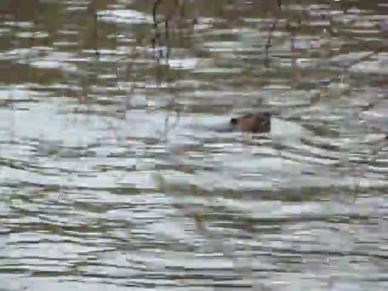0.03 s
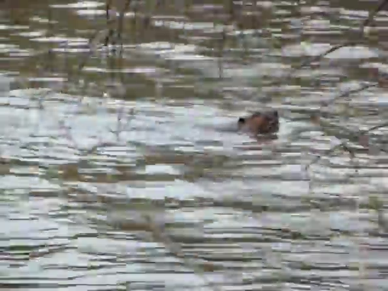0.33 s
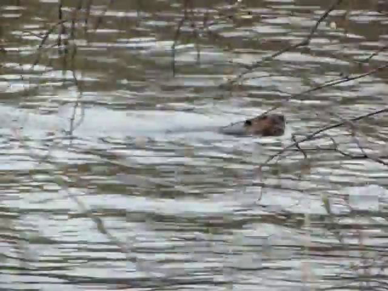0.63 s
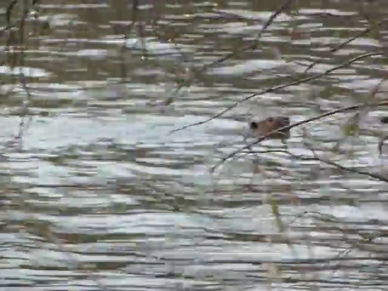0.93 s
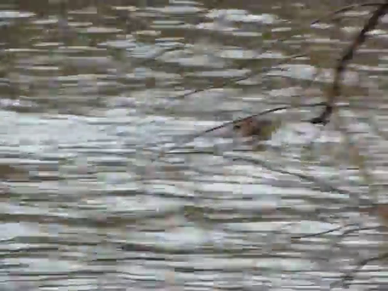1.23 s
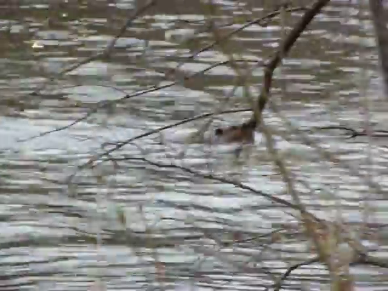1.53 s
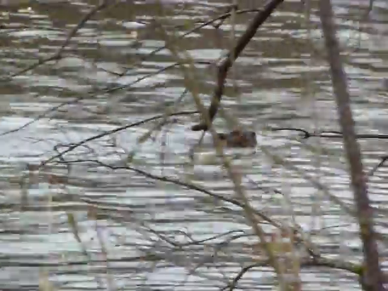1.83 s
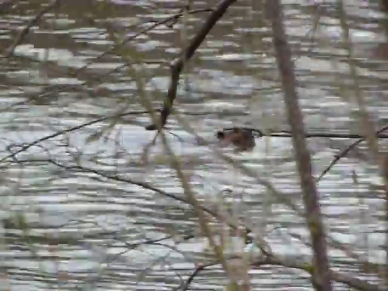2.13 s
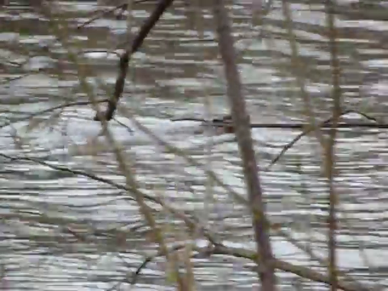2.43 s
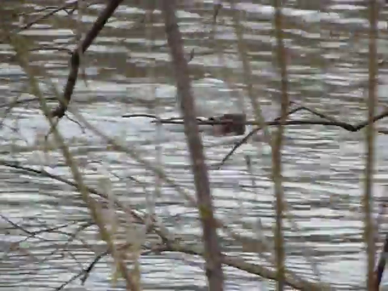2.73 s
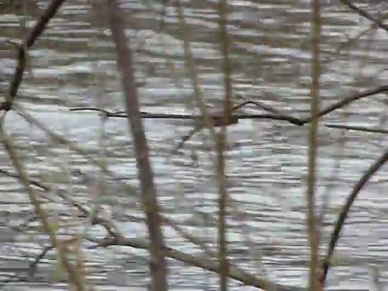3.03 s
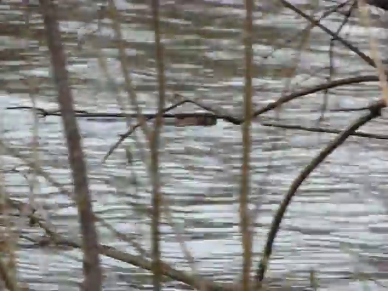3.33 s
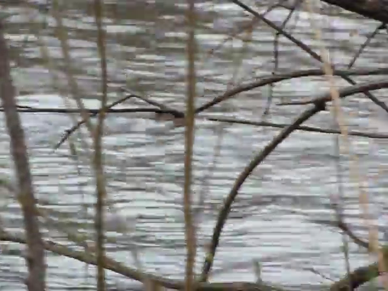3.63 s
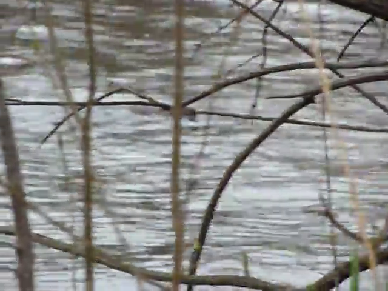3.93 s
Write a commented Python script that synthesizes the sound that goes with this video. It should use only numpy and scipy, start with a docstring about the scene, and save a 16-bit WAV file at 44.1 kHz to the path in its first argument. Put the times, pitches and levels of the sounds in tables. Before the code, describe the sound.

Flowing river water makes an even, low rush outdoors. A brief puff of wind hits the microphone and a distant bird chirps faintly, then stronger wind rumbles on the microphone and ends in loud, knock-like slaps.

```python
"""A wide river flows steadily past a wooded bank, heard from the bank on one microphone open to the wind.
The current is an even rush with tiny ringing bubbles. Off in the trees a small bird twitters and ticks
faintly, and dry grass rustles. Right on the microphone, a brief puff of wind opens the scene; from just
past halfway a rising gust buffets it: low flutter first, then hard slaps that sound like knocks.
The stronger the wind, the higher in frequency its turbulence reaches."""
import sys
import numpy as np
from scipy import signal
from scipy.fft import rfft, irfft, next_fast_len
from scipy.io import wavfile
from scipy.ndimage import uniform_filter1d, minimum_filter1d, map_coordinates

SR = 44100
rng = np.random.default_rng(int(sys.argv[2]) if len(sys.argv) > 2 else 0)


def int16_out(signal):
    """Quantize to a 16-bit WAV file."""
    q = np.round(np.clip(np.atleast_2d(signal).T, -1, 1) * 32767)
    wavfile.write(sys.argv[1], SR, q.astype(np.int16))


N = 176400

# the current as heard from the bank: f/Hz, relative level/dB
RIVER_SPECTRUM = [(25, -17.5), (40, -9), (75, 1.5), (130, -2.5), (230, -3), (380, -11), (750, -10),
                  (1200, -13.5), (2000, -21.5), (3000, -28), (4200, -32), (6500, -39), (8200, -43.5)]
# a small lap of water: t/s, level/dB, half-length/s, reach f/Hz
WATER_LAPS = [(1.016, -43.5, 0.0087, 850)]
# the opening puff at the microphone: t/s, level/dB
PUFF_LEVELS = [(0, -29.5), (.035, -27.5), (.06, -54), (.15, -65), (.22, -40), (.29, -73), (.355, -40),
               (.41, -47), (.5, -65)]
# the rising gust at the microphone: t/s, level/dB
GUST_LEVELS = [(2.44, -70), (2.474, -41), (2.504, -45), (2.538, -26), (2.578, -50), (2.612, -35.5),
               (2.678, -45.5), (2.708, -32.5), (2.73, -46.5), (2.756, -26), (2.778, -38.5), (2.808, -25.5),
               (2.87, -45), (2.904, -44), (2.938, -27.5), (2.96, -24), (3.0, -27.5), (3.026, -24),
               (3.1, -22), (3.148, -32.5), (3.174, -28.5), (3.248, -32.5), (3.368, -24.5), (3.382, -20),
               (3.456, -20.5), (3.474, -31), (3.5, -21.5), (3.534, -33.5), (3.578, -21), (3.608, -34.5),
               (3.638, -21), (3.686, -28), (3.72, -19.5), (3.774, -10.5), (3.794, -18), (3.882, -19.5),
               (3.9, -35), (3.93, -10.5), (3.952, -19.5), (4.0, -9.5)]
# turbulence, before the wind's strength sets its treble: f/Hz, relative level/dB
BUFFET_SPECTRUM = [(20, -12), (50, -4.5), (110, 2), (200, 1.5), (400, -7), (1000, -14), (3000, -28),
                   (8000, -33.5)]
# hard eddies hitting the microphone: t/s, level/dB, half-length/s, reach f/Hz
EDDY_SLAPS = [(2.474, -36, 0.0064, 140), (2.604, -35.5, 0.0087, 300), (2.808, -19.5, 0.0051, 118),
              (2.969, -30, 0.0039, 400), (3.094, -26.5, 0.016, 377), (3.206, -26.5, 0.0045, 510),
              (3.415, -37, 0.016, 380), (3.446, -15, 0.0022, 674), (3.578, -25.5, 0.003, 189),
              (3.638, -24.5, 0.0092, 200), (3.722, -7.5, 0.0026, 780), (3.732, -7, 0.0026, 1504),
              (3.745, -9.5, 0.0023, 550), (3.759, -5.5, 0.0059, 193), (3.775, -7, 0.003, 900),
              (3.787, -12, 0.0065, 1360), (3.800, -15, 0.0036, 850), (3.816, -19.5, 0.013, 900),
              (3.836, -18.5, 0.0014, 1300), (3.858, -28, 0.0033, 640), (3.875, -17, 0.0026, 600),
              (3.930, -15.5, 0.0051, 450), (3.938, -14.5, 0.0055, 900), (3.989, -17.5, 0.015, 684)]
# a slap, before it is rolled off by its reach: f/Hz, relative level/dB
SLAP_SPECTRUM = [(20, -15.5), (100, -0.5), (300, 2), (700, -2.5), (1500, -8), (3000, -12.5), (4500, -18.5),
                 (8000, -26)]
# the bird's dry ticks: t/s, level/dB, half-length/s, pitch f/Hz
BIRD_TICKS = [(1.836, -63, .004, 6000), (1.914, -65, .004, 6300), (2.045, -65, .012, 6200),
              (2.141, -51, 0.01, 6360), (2.390, -52, 0.0069, 6760), (2.630, -53, 0.0064, 6500),
              (3.538, -71, .003, 5940)]
# its thin twitter notes: t/s, level/dB
BIRD_NOTES = [(.10, -74), (.20, -71.5), (.325, -71.5), (.435, -69.5), (.555, -72), (.66, -75), (.785, -75),
              (.89, -71.5)]
# dry twigs and grass in the breeze: t/s, level/dB
RUSTLE_LEVELS = [(1.6, -74), (1.95, -69), (2.2, -73), (2.8, -73.5), (3.2, -65.5), (3.38, -70.5),
                 (3.65, -67), (3.75, -78.5)]
# their hiss: f/Hz, relative level/dB
RUSTLE_SPECTRUM = [(1500, -17), (4000, 1.5), (7000, 14), (8200, -9.5)]

RIVER_DB, RIVER_SWAY_DB, RIVER_PATCHY_DB = -45.5, 0.72, 0.78
BUBBLES_PER_S, BUBBLE_HZ, BUBBLE_SPREAD, BUBBLE_CYCLES, BUBBLE_DB = 400, 1050, .7, 6, -67
BUFFET_DB, FLUTTER_DB, GUST_SMOOTH_S = -2.5, 4.5, 0.016
REACH_HZ, REACH_AT_DB, REACH_GROWTH = 250, -27, .55  # reach: the frequency scale of the treble roll-off
CRACKLE_DB, CRACKLE_PER_S = 2, 170  # the reach jumps about from eddy to eddy
NOTE_S, NOTE_START_HZ, NOTE_END_HZ, NOTE_WAVER = .048, 6900, 7750, .008
TICK_WIDTH, TICK_SKIRT_DB, TICK_SKIRT_HZ = .1, -9, 5400  # width in log frequency
WOOD_T60_S, WOOD_DB = .25, -11
CEILING, LIMIT_HOLD_S, LIMIT_RELEASE_S, TOP_HZ = 0.65, 0.12, 0.12, 8400


def river():
    """The current from the bank: an even rush that sways slowly, in shifting patches of the spectrum."""
    spectra = signal.stft(rng.standard_normal(N), nperseg=512)[2]
    patches = uniform_filter1d(rng.standard_normal(spectra.shape), size=6, axis=0)
    patches = uniform_filter1d(patches, size=14, axis=1)
    noise = signal.istft(spectra * amp(RIVER_PATCHY_DB * unit(patches)), nperseg=512)[1][:N]
    rush = filtered(noise, lambda f: gain_at(RIVER_SPECTRUM, f))
    return amp(RIVER_DB + RIVER_SWAY_DB * wobble(1.6)) * unit(rush)


def ripples():
    """On the water: many tiny bubbles ring, each rising in pitch as it dies, and one wavelet laps."""
    bubbles, t = np.zeros(N), np.arange(SR // 25) / SR
    for when, pitch, size in rng.random((int(BUBBLES_PER_S * N / SR), 3)):
        cycles = t * BUBBLE_HZ * np.exp(BUBBLE_SPREAD * (2 * pitch - 1))
        age = cycles / BUBBLE_CYCLES
        ring = np.sin(2 * np.pi * cycles * (1 + 0.16 * np.minimum(age, 2)))
        envelope = np.exp(-2 * age) * (1 - np.exp(-cycles))
        add(bubbles, when * N / SR, amp(10 * (size - pitch)) * ring * envelope)
    lap = bursts(WATER_LAPS, lambda f, reach: f / (f + reach) * np.exp(-f / reach))
    return amp(BUBBLE_DB) * unit(bubbles) + lap


def buffeting():
    """Turbulence on the microphone: each octave flutters alone; high ones wake only in strong wind."""
    level_db = np.maximum(timeline(PUFF_LEVELS, outside=-90), timeline(GUST_LEVELS, outside=-90))
    strength_db = np.maximum(level_db - REACH_AT_DB, -6)
    reach = REACH_HZ * amp(REACH_GROWTH * strength_db + CRACKLE_DB * wobble(CRACKLE_PER_S))
    noise = filtered(rng.standard_normal(N), lambda f: gain_at(BUFFET_SPECTRUM, f))
    flutter = np.zeros(N)
    for hz in 2. ** np.arange(4, 14):
        octave = filtered(noise, lambda f: np.maximum(1 - np.abs(np.log2((f + 1) / hz)), 0))
        flutter += octave * np.exp(-hz / reach) * amp(FLUTTER_DB * wobble(70))
    # even out the short-term power, so that the gust sets the level
    window = int(GUST_SMOOTH_S * SR)
    power = np.abs(uniform_filter1d(uniform_filter1d(flutter ** 2, window), window))
    return amp(level_db + BUFFET_DB) * flutter / np.sqrt(power + 1e-20)


def slaps():
    """Single hard eddies strike the microphone itself: short, dull thumps."""
    return bursts(EDDY_SLAPS, lambda f, reach: gain_at(SLAP_SPECTRUM, f) * np.exp(-f / reach))


def bird():
    """Off in the wood: rising notes, then ticks (a narrow band on a broad skirt), echoed by the trees."""
    def hump(f, hz, width):
        return np.exp(-.5 * (np.log((f + 1) / hz) / width) ** 2)

    skirt = amp(TICK_SKIRT_DB)
    calls = bursts(BIRD_TICKS, lambda f, hz: hump(f, hz, TICK_WIDTH) + skirt * hump(f, TICK_SKIRT_HZ, .25))
    progress = np.linspace(0, 1, int(NOTE_S * SR))
    glide_hz = NOTE_START_HZ + (NOTE_END_HZ - NOTE_START_HZ) * progress
    for start, db in BIRD_NOTES:
        hz = glide_hz * (1 + NOTE_WAVER * wobble(200)[:len(progress)])
        tone = np.sin(2 * np.pi * np.cumsum(hz) / SR)
        add(calls, start, amp(db) * np.sin(np.pi * progress) * tone)
    tail = rng.standard_normal(SR // 2) * amp(-60 * np.arange(SR // 2) / SR / WOOD_T60_S)
    echo = signal.fftconvolve(calls, tail / np.linalg.norm(tail))[:N]
    return calls + amp(WOOD_DB) * echo


def rustle():
    """In the background the breeze stirs dry twigs and grass on the bank: a faint, grainy hiss."""
    hiss = filtered(rng.standard_normal(N), lambda f: gain_at(RUSTLE_SPECTRUM, f))
    grain = amp(wobble(120))  # flickers by about 1 dB
    return amp(timeline(RUSTLE_LEVELS)) * unit(hiss * grain)


def bursts(rows, response):
    """Bell-shaped bursts of noise with an even spectrum, each coloured by response(f, its own f/Hz)."""
    track, t = np.zeros(N), np.arange(-4096, 4096) / SR
    for centre, db, half_length, hz in rows:
        bell = np.exp(-(t / half_length) ** 2)
        phases = np.angle(rfft(bell * rng.standard_normal(len(t))))
        even_noise = irfft(np.exp(1j * phases))
        burst = filtered(bell * even_noise, lambda f: response(f, hz))
        add(track, centre + t[0], amp(db) * burst * np.linalg.norm(bell ** 2) / np.linalg.norm(burst))
    return track


def amp(db):
    return 10 ** (np.asarray(db) / 20)


def unit(x):
    return x / np.sqrt(np.mean(x ** 2) + 1e-20)


def gain_at(spectrum, hz):
    """Amplitude from (f/Hz, level/dB) points joined on a log frequency axis."""
    f, db = np.transpose(spectrum)
    return amp(np.interp(np.log(hz + 1), np.log(f + 1), db))


def timeline(points, outside=None):
    """Level/dB at every sample from (t/s, level/dB) points."""
    return np.interp(np.arange(N) / SR, *np.transpose(points), left=outside, right=outside)


def wobble(rate):
    """A smooth random curve, rate knots a second."""
    return map_coordinates(rng.standard_normal(int(N * rate / SR) + 4), [np.arange(N) * rate / SR])


def filtered(x, response):
    """x with its spectrum shaped by response(f)."""
    size = next_fast_len(len(x) + 8192)
    return irfft(rfft(x, size) * response(np.fft.rfftfreq(size, 1 / SR)), size)[:len(x)]


def add(track, start_s, sound):
    """Mix a sound into the track from start_s on."""
    part = track[max(round(start_s * SR), 0):][:len(sound)]
    part += sound[:len(part)]


def limiter(x):
    """The gain ducks at once under a loud peak, holds, then recovers."""
    ahead, hold, release = SR // 500, int(LIMIT_HOLD_S * SR), int(LIMIT_RELEASE_S * SR)
    needed = minimum_filter1d(np.minimum(1, CEILING / (np.abs(x) + 1e-9)), ahead)
    held = minimum_filter1d(needed, hold, origin=(hold - 1) // 2)
    gain = np.minimum(held, uniform_filter1d(held, release, origin=(release - 1) // 2))
    return x * uniform_filter1d(gain, ahead)


def scene():
    """River, wood and wind at one microphone on the bank, in mono."""
    return (river() + ripples() + rustle() + bird() + buffeting() + slaps())[None]


def record(dry):
    """The camera limits the hardest slaps and cuts off steeply above TOP_HZ."""
    return np.array([filtered(limiter(x), lambda f: 1 / np.sqrt(1 + (f / TOP_HZ) ** 80)) for x in dry])


dry = scene()
out = record(dry)
int16_out(out)
```